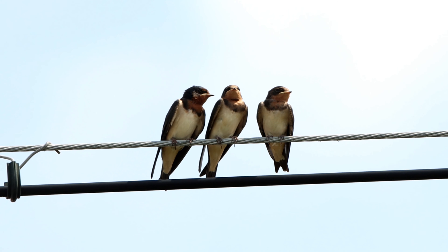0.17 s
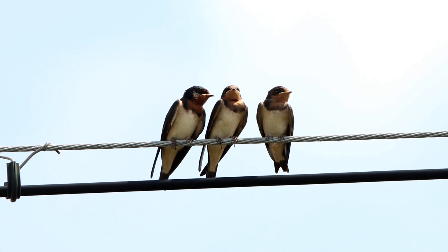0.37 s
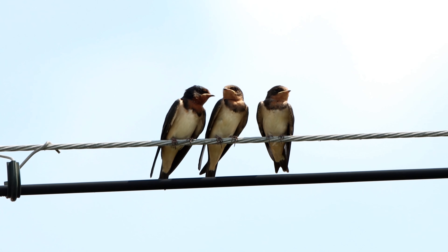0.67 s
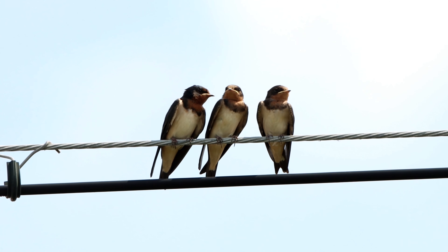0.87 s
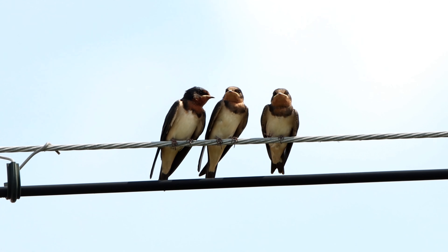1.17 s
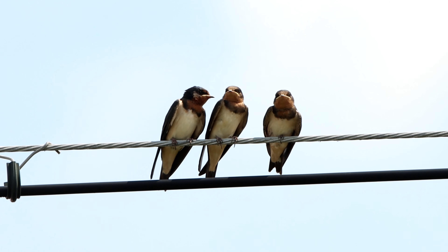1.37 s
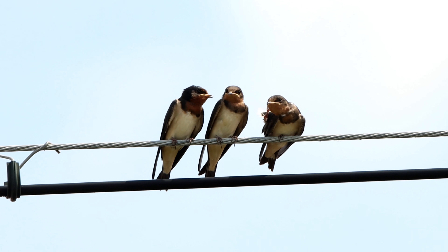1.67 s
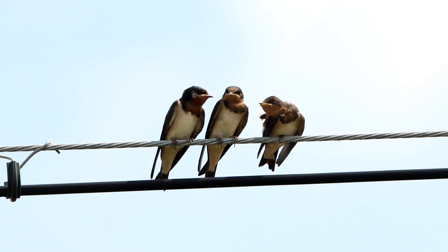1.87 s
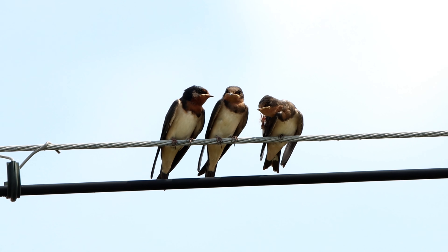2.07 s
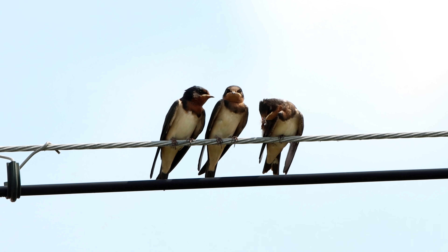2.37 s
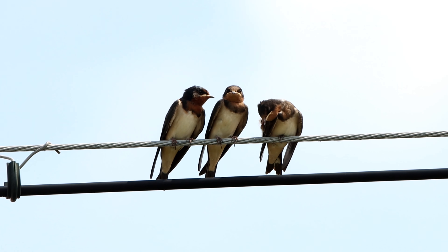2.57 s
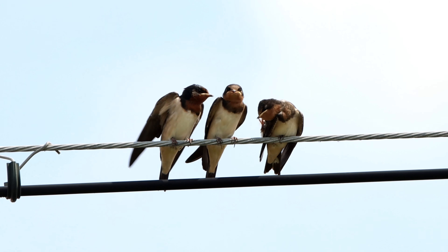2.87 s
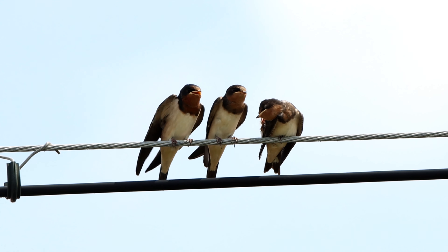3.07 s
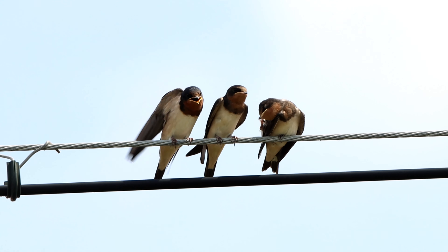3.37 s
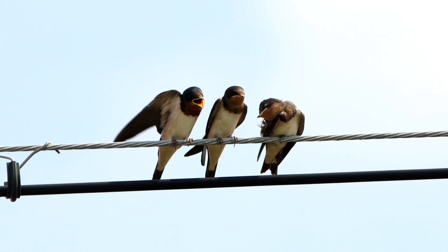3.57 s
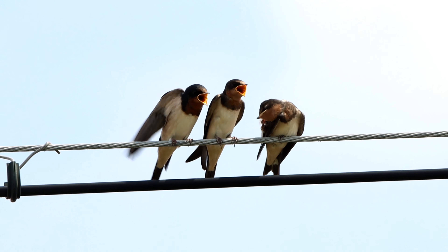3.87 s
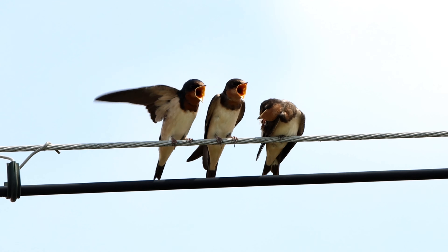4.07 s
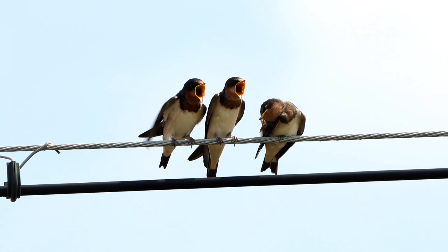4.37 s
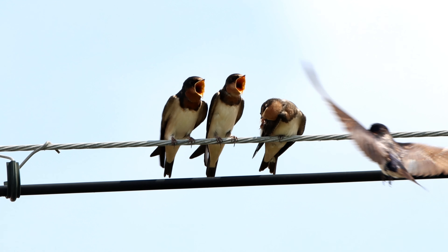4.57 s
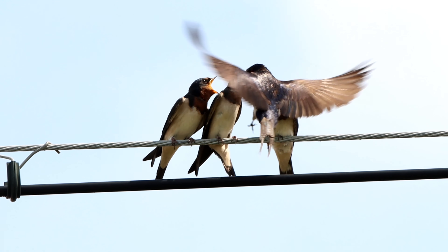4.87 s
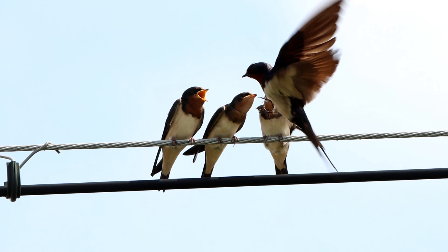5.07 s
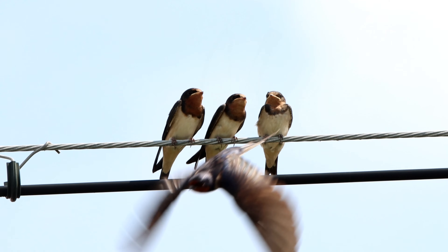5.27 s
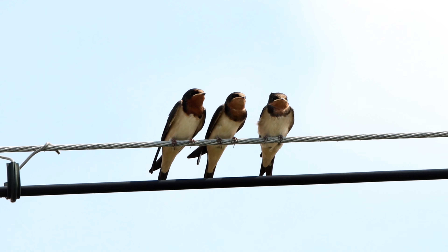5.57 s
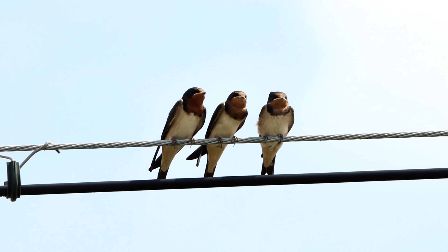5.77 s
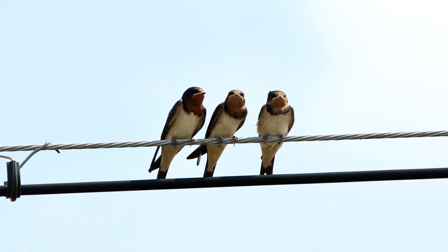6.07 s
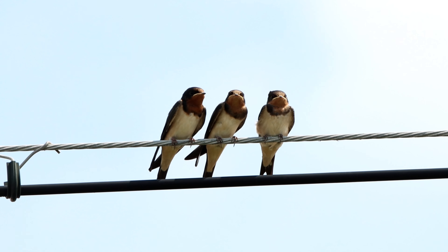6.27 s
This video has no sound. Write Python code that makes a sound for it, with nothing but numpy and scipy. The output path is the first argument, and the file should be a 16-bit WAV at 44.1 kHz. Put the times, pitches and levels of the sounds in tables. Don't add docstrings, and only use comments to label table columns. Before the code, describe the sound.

A steady outdoor bed of distant traffic hiss, faint insects and low machine hum. A vehicle revs up and pulls away in the first two seconds while distant sparrows chirp. Close young swallows give a few upswept chirps, then beg in a dense, raspy, overlapping run from about three to five seconds. The stereo microphone catches low wind rumble and, near the end, a strong gust thumping on the right.

```python
import sys
import numpy as np
from scipy import signal
from scipy.io import wavfile
from scipy.ndimage import uniform_filter1d

SR = 44100
rng = np.random.default_rng(int(sys.argv[2]) if len(sys.argv) > 2 else 0)


def to_wav(sig):
    pcm = np.clip(np.atleast_2d(sig), -1, 1) * 32767
    pcm = np.round(pcm).astype(np.int16)
    wavfile.write(sys.argv[1], SR, pcm.T)


def voltage_ratio(level):
    return 10 ** (np.asarray(level, float) / 20)


N = 283563
T = np.arange(N) / SR


def rms_one(x):
    return x / np.sqrt(np.mean(x ** 2) + 1e-20)


def in_time(rows, silent_db=None):
    s, *columns = np.transpose(rows)
    return [np.interp(T, s, column, silent_db, silent_db) for column in columns]


def at_hz(points, hz):
    point_hz, value = np.array(points).T
    return np.interp(np.log(hz), np.log(point_hz), value)


def drift(rate_hz, size=N):
    r = np.exp(-2 * np.pi * rate_hz / SR)
    run_in = int(SR / rate_hz / 2)
    white = rng.standard_normal(size)
    white = np.r_[white[-run_in:], white]
    return rms_one(signal.lfilter([1], [1, -2 * r, r * r], white)[-size:])


def band(x, low_hz, high_hz):
    edges_hz = [low_hz, min(high_hz, .45 * SR)]
    return signal.sosfilt(signal.butter(2, edges_hz, "band", fs=SR, output="sos"), x)


def phase_of(hz):
    return 2 * np.pi * np.cumsum(hz) / SR


def outdoors():
    # (frequency [Hz], spectral density [dB per Hz])
    traffic_spectrum = [(150, -6), (230, -11.5), (500, -16.5), (850, -14.5), (1940, -24.5), (3000, -33.5),
                        (4400, -36), (7500, -43.5), (10800, -48), (13500, -52.5), (15400, -49)]
    # (frequency [Hz], left-right correlation [-1 to 1])
    port_likeness = [(130, 1), (290, 0.96), (640, 0.66), (1410, 0.0078), (6800, 0.026), (15000, 0.17)]
    out, together = 0, drift(1.5)
    third_octaves_hz = 150 * 2 ** np.arange(0, 6.9, 1 / 3)
    white = rng.standard_normal((2, 2, N))
    for k, (low_hz, high_hz) in enumerate(zip(third_octaves_hz, third_octaves_hz[1:])):
        mid, side = band(white[k % 2], low_hz, high_hz)
        hz = np.sqrt(low_hz * high_hz)
        alike = np.clip(at_hz(port_likeness, hz), -1, 1)
        gain = voltage_ratio(at_hz(traffic_spectrum, hz) + .5 * together + 0.58 * drift(4.2))
        out = out + gain * (np.sqrt(1 + alike) * mid + np.sqrt(1 - alike) * side * [[1], [-1]])
    return voltage_ratio(-48.5 + 3.5) * rms_one(out)


def insects():
    low_hz, high_hz = 8700, 10140
    hiss = band(band(rng.standard_normal((2, N)), low_hz, high_hz), low_hz, high_hz)
    return voltage_ratio(-68 + 0.52 * drift(17)) * rms_one(hiss)


def machine():
    # (time [s], second order [dB], third order [dB])
    hum_levels = [(0.0, -66, -34.5), (0.09, -43, -94), (0.62, -47, -41), (1.92, -46, -43.5),
                  (2.17, -51, -58.5), (2.35, -46.5, -48), (3.46, -50.5, -54.5), (3.53, -48.5, -44.5),
                  (6.03, -42, -42), (6.12, -37, -30.5), (6.43, -63, -59.5)]
    second_db, third_db = in_time(hum_levels)
    shaft = phase_of(46.65 * (1 + 0.01214 * drift(3.02)))
    hum = voltage_ratio(second_db + 3.1 * drift(8.1)) * np.sin(2 * shaft)
    hum += voltage_ratio(third_db + 2.64 * drift(13.7)) * np.sin(3 * shaft)
    whine_phase = phase_of(793 * (1 + 0.00543 * drift(7.74)))
    whine = voltage_ratio(-65.5 + 3.2 * drift(3.8)) * np.sin(whine_phase)
    return np.sqrt(2) * (hum + whine)


def vehicle():
    # (time [s], firing rate [Hz], low orders [dB], upper orders [dB])
    pull_away = [
        (0, 61.55, -46, -60.5),
        (.45, 68.27, -42, -57),
        (.7, 69.73, -46, -55.5),
        (1.1, 72.23, -51.5, -51.5),
        (1.6, 77.66, -53, -55),
        (1.9, 74.5, -50, -76),
    ]
    # (order [multiple of firing rate], level [dB])
    exhaust_orders = [(1, 0), (2, 1)], [(4, 0), (5, -12), (6, -8)]
    hz, *levels_db = in_time(pull_away)
    firing = phase_of(hz * (1 + 0.0026 * drift(2.3)))
    exhaust = np.zeros(N)
    for level_db, orders in zip(levels_db, exhaust_orders):
        for order, db in orders:
            exhaust += voltage_ratio(level_db + db + 2.54 * drift(6.7)) * np.sin(order * firing)
    return np.sqrt(2) * exhaust * (T < pull_away[-1][0])


def wind():
    # (time [s], left [dB], right [dB])
    port_wind = [(0.0, -50, -53), (0.75, -54, -51.5), (2.38, -46, -48.5), (2.81, -52, -42),
                 (3.19, -48, -48), (3.46, -56, -35.5), (4.57, -41.5, -47.5), (4.84, -41, -36.5),
                 (6.18, -57, -55), (6.34, -39, -37), (6.43, -73, -78)]
    ports = []
    for db in in_time(port_wind):
        lumpy_gain = voltage_ratio(db + 3.5 * drift(31))
        ports.append(lumpy_gain * rms_one(band(rng.standard_normal(N), 30.5, 118)))
    return np.array(ports)


def far_birds():
    # (time [s], level [dB], start pitch [Hz], end pitch [Hz], length [s])
    far_chirps = [(0.055, -58, 5070, 3180, 0.048), (0.193, -64, 4000, 3270, 0.021),
                  (0.607, -58, 5040, 3330, 0.041), (0.75, -65, 5350, 3380, .06),
                  (0.847, -57.5, 6270, 3547, 0.038), (1.23, -71.5, 7525, 4570, 0.035),
                  (1.54, -66, 6026, 4470, .018), (1.667, -56.5, 5300, 3820, 0.05),
                  (2.362, -61.5, 5370, 3380, 0.043), (2.696, -56.5, 5450, 3400, 0.048),
                  (3.258, -61.5, 4800, 4220, 0.03), (5.244, -59, 4630, 3470, 0.025),
                  (5.739, -58, 5030, 3510, 0.045), (6.043, -63.5, 5960, 3110, 0.079)]
    out = np.zeros(N)
    for s, db, from_hz, to_hz, length in far_chirps:
        u = np.arange(round(length * SR)) / (length * SR)
        size = len(u)
        hz = from_hz + (to_hz - from_hz) * u + 150 * drift(80, size=size)
        phase = phase_of(hz)
        blur = drift(450, size=size) * np.sin(phase) + drift(450, size=size) * np.cos(phase)
        swell = np.sin(np.pi * u) ** 0.46 * voltage_ratio(2.4 * drift(90, size=size))
        at = round(s * SR)
        out[at:at + size] += voltage_ratio(db) * swell * blur
    return out


def echoes(x, t60, wet_db):
    t = np.arange(round(.35 * SR)) / SR
    tail = rng.standard_normal((2, len(t))) * voltage_ratio(-60 * t / t60) * np.clip(t / 0.015, 0, 1)
    tail = band(tail, 1300, 16800)
    tail /= np.sqrt(np.sum(tail ** 2, axis=1, keepdims=True))
    blurred = x * (.35 + .94 * drift(300))
    return voltage_ratio(wet_db) * signal.fftconvolve(blurred[None], tail, axes=1)[:, :N]


def calls():
    # (time [s], upper voice [Hz], lower voice [Hz], upper [dB], lower [dB])
    even = [(-.046, 4310, 2960, -1.5, -14), (-.03, 4590, 3286, -4, -15), (-.012, 5420, 4030, 1, -2.5),
            (-.003, 6060, 4466, -1.5, -2), (0, 5990, 4470, -8.5, -2), (.01, 5930, 4440, -34, -8)]
    late = [(-.068, 4000, 3250, -24.5, -20), (-.036, 4000, 3320, -17.5, -11.5),
            (-.025, 4297, 3404, -11.5, -9), (-.012, 4930, 3530, -6.5, -5), (-.004, 5550, 4020, -3, 0.5),
            (0, 5700, 4170, 0.5, 1), (.008, 5765, 4370, -12, 6)]
    drawn = [(-.075, 3750, 2850, -12, -14), (-.06, 4000, 2950, -18, -11), (-.045, 4310, 3020, -16, -7),
             (-.014, 4894, 3420, -11, -1), (-.005, 5480, 3980, -5, 3), (0, 5633, 4170, 0.5, 1.5),
             (.007, 5260, 4140, -22, -1)]
    short = [(-.04, 4450, 3310, -12, -8), (-.02, 4880, 3506, -12, -4.5), (-.008, 5470, 4220, -4, 1),
             (0, 6000, 4650, 1, 1), (.009, 5650, 4507, -17, 1)]
    # (time of top [s], stretch of rise [ratio], top pitch [Hz], upper [dB], lower [dB])
    even_calls = [(1.605, 0.98, 6000, -44.5, -39.5), (1.746, 0.93, 5840, -46, -39.5),
                  (2.971, 1.01, 6020, -42, -38.5), (3.095, 1.06, 5710, -40.5, -45)]
    late_calls = [(3.399, 1.08, 5590, -37, -50), (3.544, 0.9, 5660, -37, -53),
                  (3.697, 0.85, 5710, -35.5, -51), (3.852, 1.1, 5720, -38, -52),
                  (4.007, 1.01, 5740, -37, -48.5), (5.077, 1, 5590, -37, -49.5),
                  (5.223, 0.93, 5550, -34.5, -49.5)]
    drawn_calls = [(4.154, 0.98, 5650, -37.5, -53), (4.313, 0.86, 5660, -36.5, -48.5),
                   (4.474, 1.24, 5580, -37, -48.5), (4.622, 0.75, 5720, -33, -48.5),
                   (4.777, 1.03, 5610, -37.5, -47.5), (4.932, 0.89, 5550, -39.5, -50.5)]
    short_calls = [(1.902, 0.46, 5570, -63, -76), (2.928, 0.88, 6000, -48.5, -51.5),
                   (3.061, 0.55, 6030, -48, -50), (3.255, 0.53, 5550, -59, -72),
                   (3.86, 0.87, 6120, -50, -51), (3.982, 0.9, 5980, -44, -53),
                   (4.123, 0.66, 5930, -41, -48), (4.267, .85, 5920, -41.5, -50),
                   (4.411, 1.06, 6020, -40.5, -50), (4.552, 0.98, 6020, -39, -49),
                   (4.697, 1, 6100, -38.5, -49), (4.838, 0.67, 5800, -48, -54),
                   (4.977, 0.82, 5450, -70, -58), (5.136, 1.2, 6010, -49, -48),
                   (5.173, 0.87, 5380, -46, -58), (5.388, 0.49, 5600, -50.5, -62)]
    for pattern, rows in [(even, even_calls), (late, late_calls), (drawn, drawn_calls), (short, short_calls)]:
        s, up_hz, low_hz, up_db, low_db = np.transpose(pattern)
        for top_s, stretch, top_hz, own_up_db, own_low_db in rows:
            shift = top_hz / up_hz[-2]
            call_s = top_s + s * np.where(s < 0, stretch, 1)
            voices = call_s, up_hz * shift, low_hz * shift, up_db + own_up_db, low_db + own_low_db
            yield voices, pattern is short


def whistles():
    # (times upper [count], times lower [count], level [dB])
    mixed_tones = [(2, -1, -8), (3, -2, -13), (4, -3, -17), (0, 2, -6), (1, 1, -7), (2, 0, -8), (2, 1, -16)]
    # (time [s], level of the mixed tones [dB])
    brood_effort = [(1.5, -11), (3.0, -11), (3.6, -7), (4.3, -3), (4.75, -2), (4.9, -6), (5.1, -6),
                    (5.4, -12)]
    out, effort_db = np.zeros(N), in_time(brood_effort)[0]
    for (s, *columns), is_short in calls():
        t = np.arange(s[0] - .003, s[-1] + 0.00047, 1 / SR)
        size, at = len(t), round(t[0] * SR)
        columns[2:] = voltage_ratio(np.array(columns[2:]))
        up_hz, low_hz, up_gain, low_gain = [
            uniform_filter1d(np.interp(t, s, column), SR // 250, mode="nearest") for column in columns]
        wobble = 1 + 0.0093 * drift(360, size=size)
        up, low = phase_of(up_hz * wobble), phase_of(low_hz * wobble)
        sound = up_gain * voltage_ratio(0.98 * drift(53, size=size)) * np.sin(up)
        sound += low_gain * voltage_ratio(1.2 * drift(63, size=size)) * np.sin(low)
        swell_db = np.clip(10 * np.log10(up_gain * low_gain) + 56, -12, 0) / 2
        mixed_db = -47.5 + swell_db + effort_db[at]
        mixed_db += np.interp(t, [s[0], s[1], s[-3], s[-2]], [-15, -2, 0, -7])
        mixed_db -= 7.2 * is_short
        own_levels_db = rng.normal(0, 2.5, len(mixed_tones))
        for (m, n, db), own_db in zip(mixed_tones, own_levels_db):
            hz = m * up_hz + n * low_hz
            throat_db = 6.6 * np.exp(-((hz - 6250) / 600) ** 2)
            tone_gain = voltage_ratio(mixed_db + db + own_db + throat_db + 2 * drift(84, size=size))
            sound += tone_gain * np.sin(m * up + n * low)
        edge = np.clip(np.minimum((t - t[0]) / .012, (t[-1] - t) / .003), 0, 1)
        out[at:at + size] += np.sqrt(2) * sound * edge * voltage_ratio(0.36 * drift(110, size=size))
    return out


def rasp():
    # (start [s], end [s], level [dB])
    hoarse_breaths = [(1.546, 1.61, -55), (1.648, 1.747, -61), (2.875, 2.98, -57), (3.009, 3.094, -54),
                      (3.113, 3.136, -71), (3.325, 3.43, -53), (3.474, 3.575, -48), (3.592, 3.733, -47.5),
                      (3.768, 3.875, -48.5), (3.905, 4.018, -47), (4.034, 4.17, -46.5), (4.184, 4.309, -46),
                      (4.328, 4.467, -48.5), (4.463, 4.656, -47), (4.62, 4.793, -49.5), (4.778, 4.945, -51),
                      (4.978, 5.103, -49), (5.13, 5.248, -50), (5.35, 5.433, -59)]
    # (frequency [Hz], width [Hz], level [dB])
    beak_resonances = [(4000, 2200, 2.5), (5650, 580, -6), (6460, 870, -5), (8900, 2800, -11.5),
                       (13800, 1800, -24)]
    clicks = (rng.random(N) < 9000 / SR) * rng.standard_normal(N)
    resonances = []
    for hz, width_hz, db in beak_resonances:
        ringing = band(band(clicks, hz - width_hz / 2, hz + width_hz / 2), hz - width_hz, hz + width_hz)
        resonances.append(voltage_ratio(db + 1.6 * drift(30)) * rms_one(ringing))
    low, *high = resonances
    shut, wide = np.zeros((2, N))
    for start, end, db in hoarse_breaths:
        u = (T - start) / (end - start)
        shut_gain = voltage_ratio(db - 5.0 - .25 * (db + 53))
        wide_gain = voltage_ratio(db - 3.0 + .4 * (db + 53))
        shut += shut_gain * np.interp(u, [-.15, .15, .5, 1.05], [0, .9, .8, 0])
        wide += wide_gain * np.interp(u, [-.15, .2, .7, .88, 1.08], [0, .5, 1, .45, 0])
    return low * shut + sum(high) * wide


def gusts():
    # (time [s], peak [dB], frequency [Hz])
    eddies = [(3.389, -22.5, 167), (3.558, -22, 138), (4.637, -13, 244), (4.65, -14.5, 161),
              (4.776, -20.5, 165), (4.798, -17.5, 161), (4.815, -14, 196), (4.837, -20.5, 156),
              (5.187, -23, 170), (5.204, -29, 236), (5.217, -14, 199), (5.231, -20.5, 194),
              (5.355, -17.5, 161), (6.09, -8.5, 204), (6.098, -6.5, 203), (6.11, -22, 160),
              (6.125, -4, 240), (6.142, -13.5, 146), (6.16, -11, 178), (6.17, -14.5, 229),
              (6.184, -17.5, 194), (6.198, -11.5, 217), (6.21, -21, 263), (6.228, -26, 200),
              (6.245, -23, 164)]
    out = np.zeros((2, N))
    for s, db, hz in eddies:
        phase = rng.uniform(0, 2 * np.pi)
        cycles = np.arange(-700, 700) * hz / SR
        swing = np.sin(2 * np.pi * cycles + phase) * np.exp(-np.abs(cycles / 0.42) ** 1.35)
        swing += 0.66 * np.sin(1.1 * np.pi * cycles + 2 * phase) * np.exp(-(cycles / 0.91) ** 2)
        at = round(s * SR) - 700
        out[:, at:at + len(swing)] += voltage_ratio(db + np.array([[-22.0], [1.5]])) * swing
    return out


def ticks():
    # (time [s], peak [dB])
    claw_ticks = [
        (3.492, -41),
        (3.627, -43),
        (3.676, -37),
    ]
    clicks = np.zeros(N)
    for s, db in claw_ticks:
        at = round(s * SR)
        clicks[at:at + 130] = voltage_ratio(db) * rng.standard_normal(130) * np.hanning(130)
    return band(clicks, 750, 3270)


def scene():
    motors = (machine() + vehicle()) * voltage_ratio(np.array([[.25], [-.25]]))
    background = outdoors() + insects() + motors + wind() + gusts()
    far = far_birds()
    brood = whistles() + rasp() + ticks()
    near = np.array([np.roll(brood, 1) * voltage_ratio(1.5), brood * voltage_ratio(0.24)])
    birds = near + echoes(brood, t60=0.5, wet_db=-12.5) + 1.44 * far + echoes(far, t60=0.22, wet_db=1.5)
    return background + birds


def top_cut(x):
    return signal.sosfilt(signal.butter(12, 15590, fs=SR, output="sos"), x)


def record(dry):
    x = signal.sosfilt(signal.butter(3, 40, "high", fs=SR, output="sos"), dry)
    x = 1.4 * np.tanh(x / 1.4)
    gap = signal.ellip(8, .3, 70, (11050, 12950), "bandstop", fs=SR, output="sos")
    return top_cut(signal.sosfilt(gap, x))


dry = scene()
out = record(dry)
to_wav(out)
```